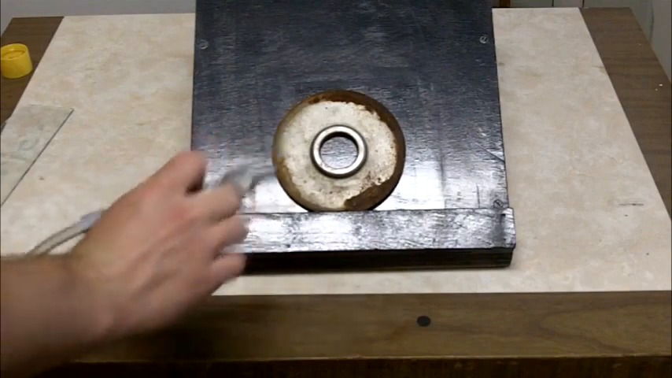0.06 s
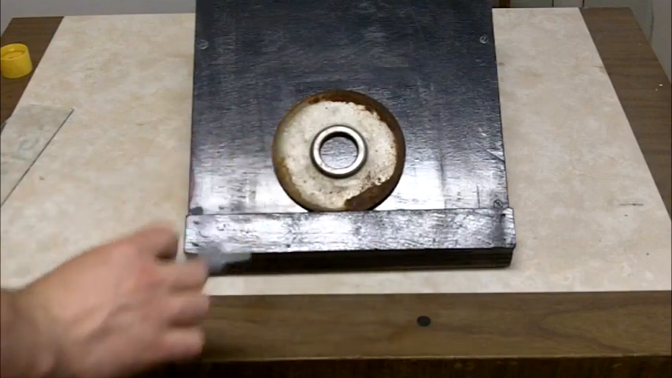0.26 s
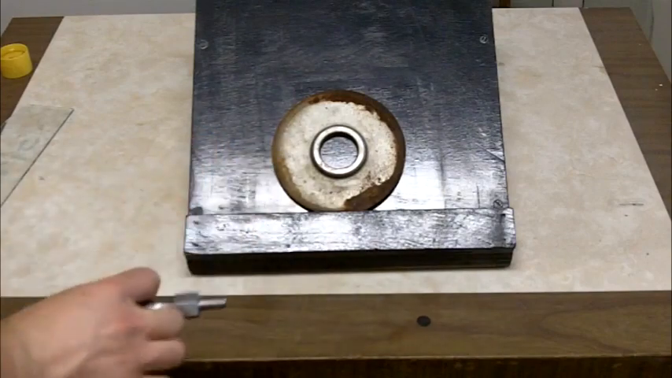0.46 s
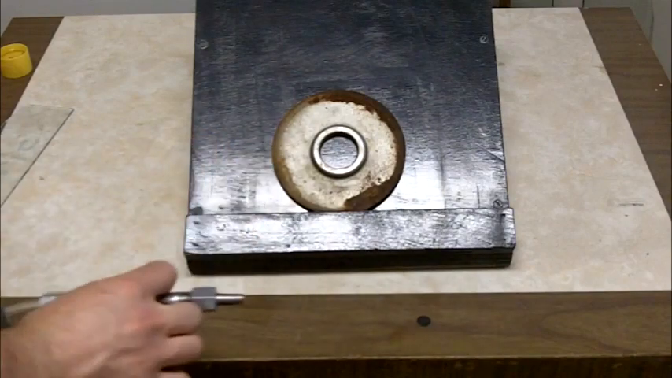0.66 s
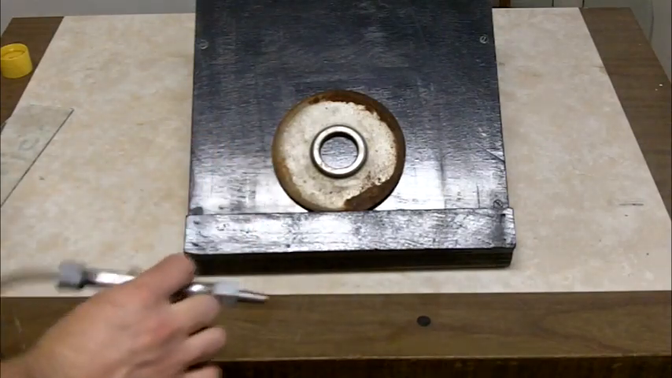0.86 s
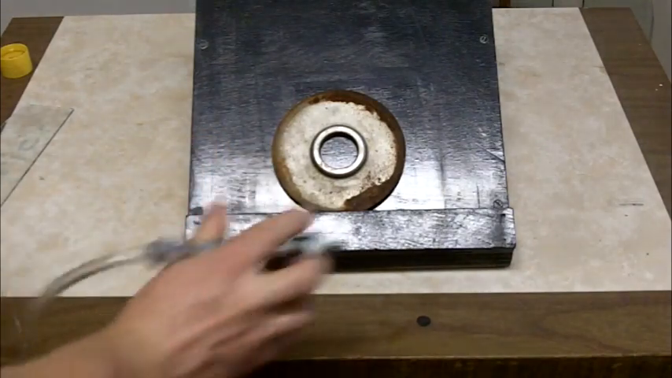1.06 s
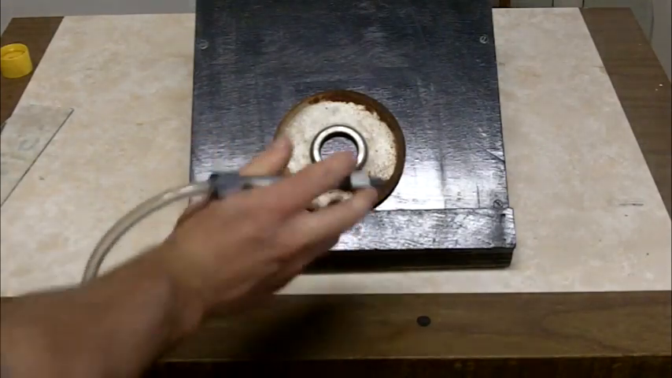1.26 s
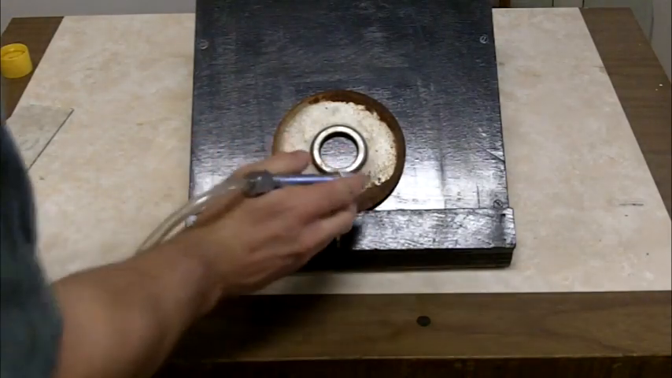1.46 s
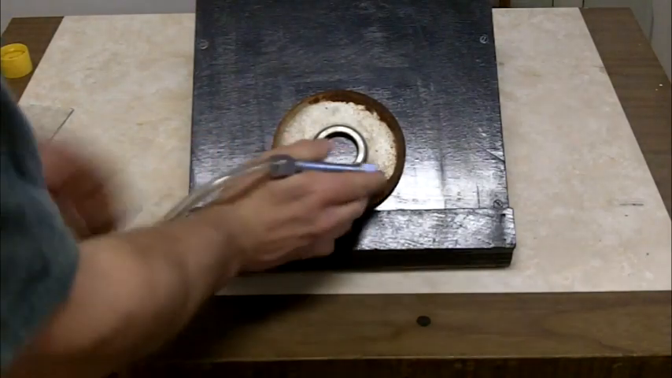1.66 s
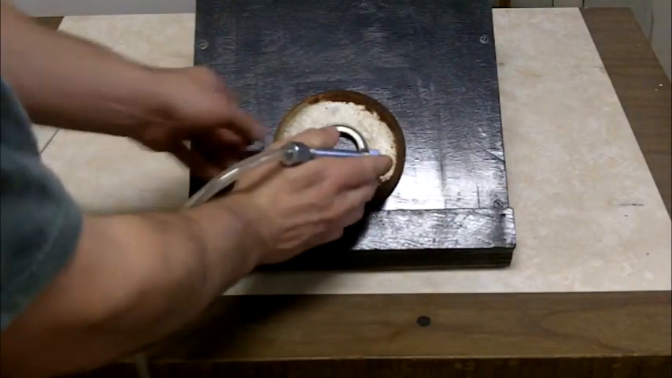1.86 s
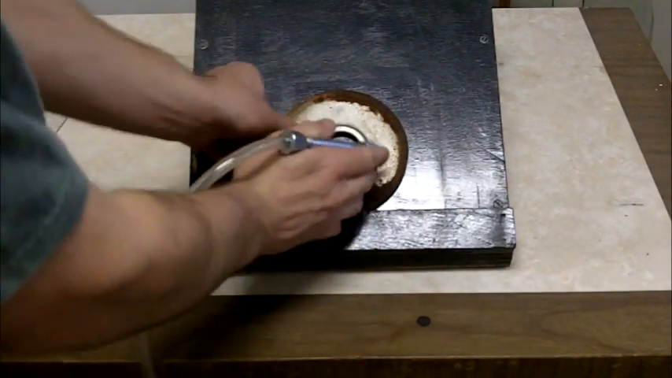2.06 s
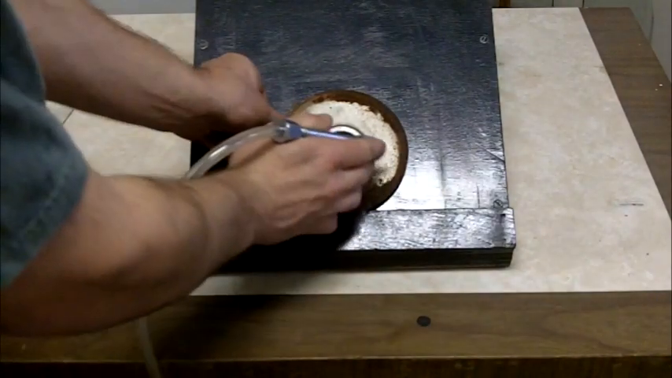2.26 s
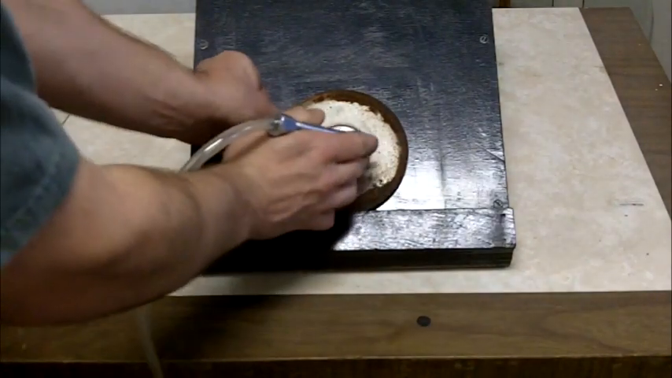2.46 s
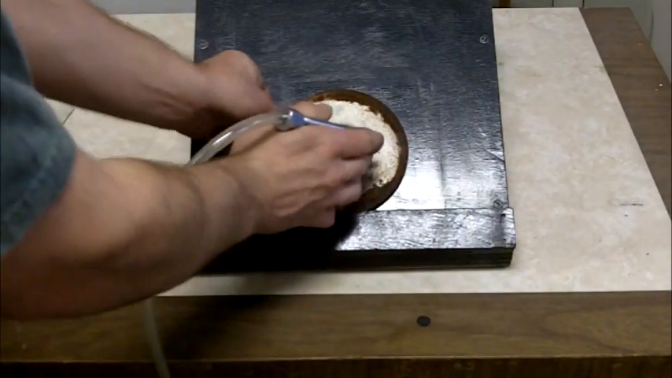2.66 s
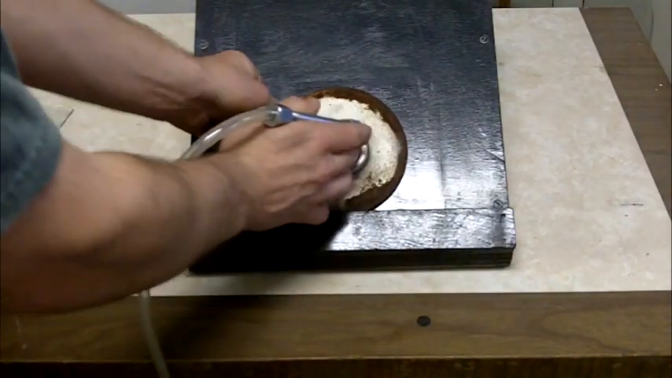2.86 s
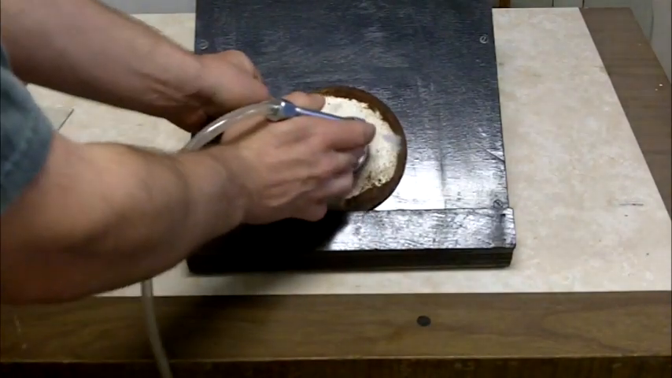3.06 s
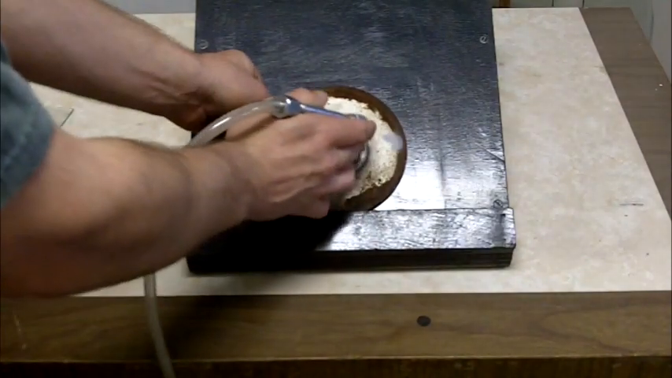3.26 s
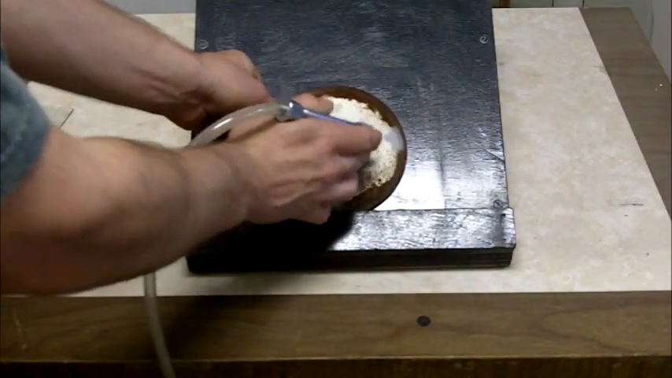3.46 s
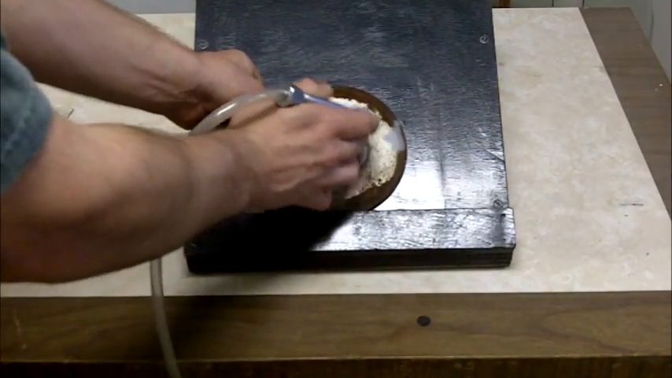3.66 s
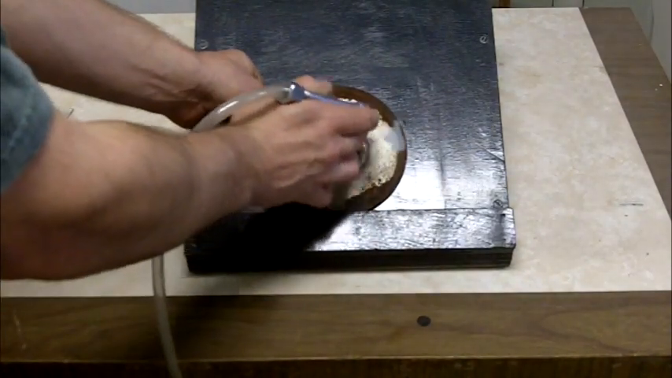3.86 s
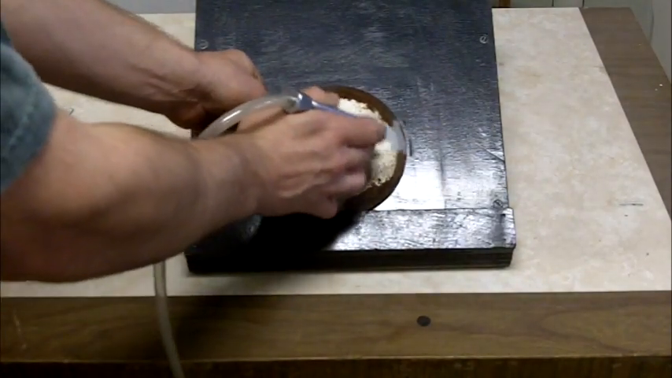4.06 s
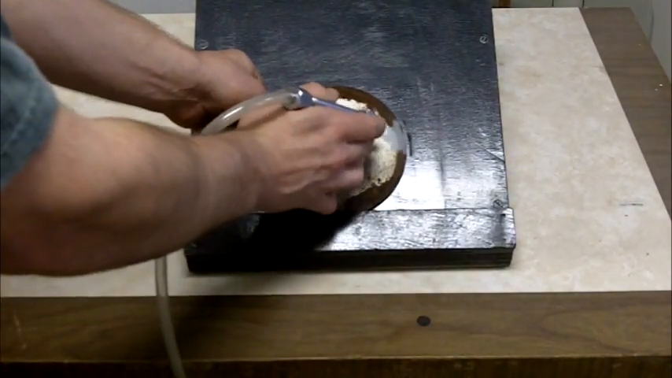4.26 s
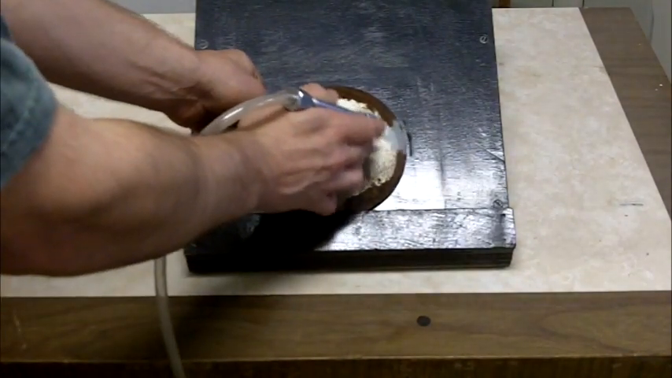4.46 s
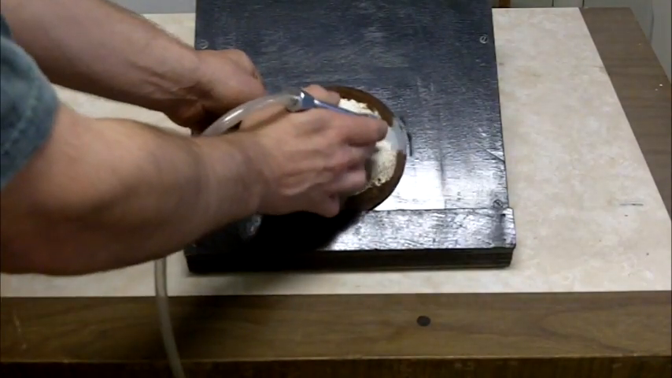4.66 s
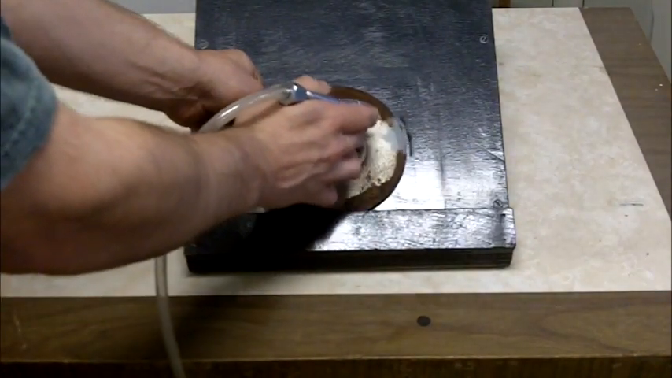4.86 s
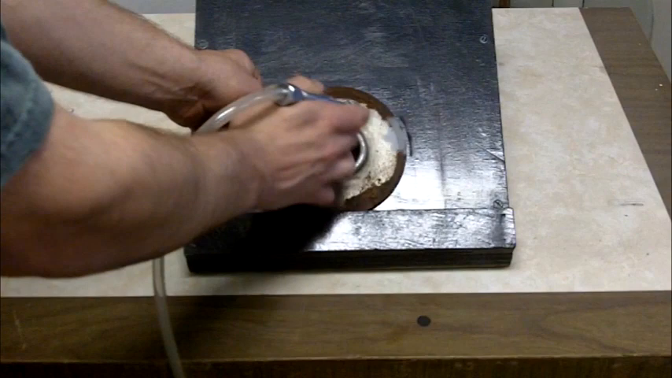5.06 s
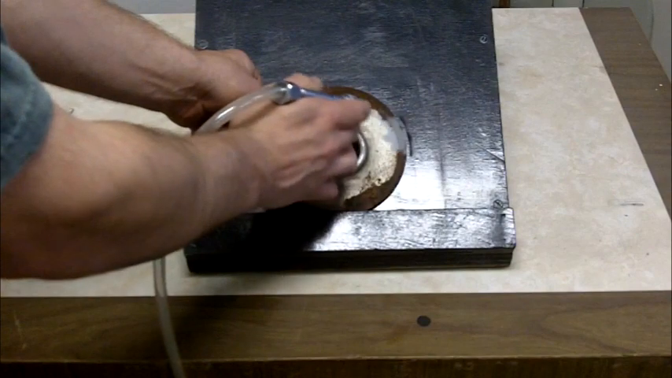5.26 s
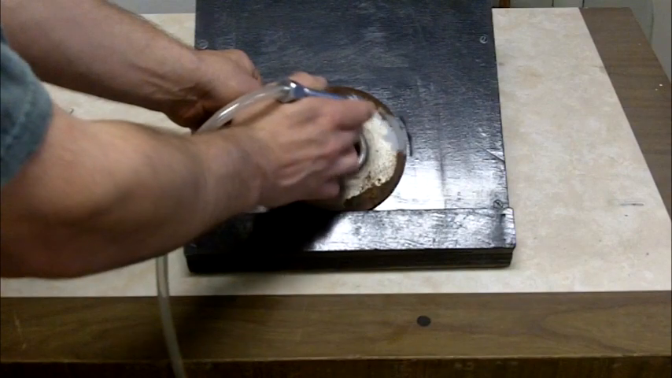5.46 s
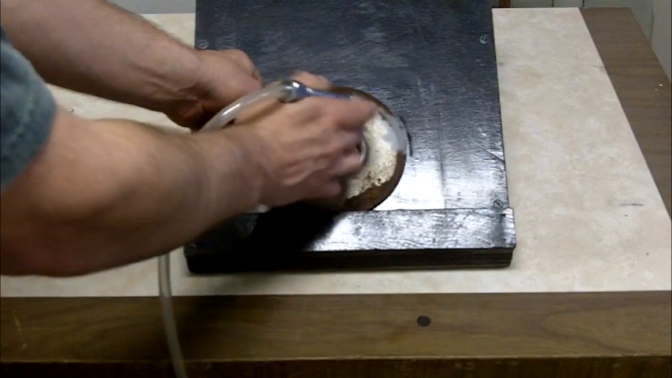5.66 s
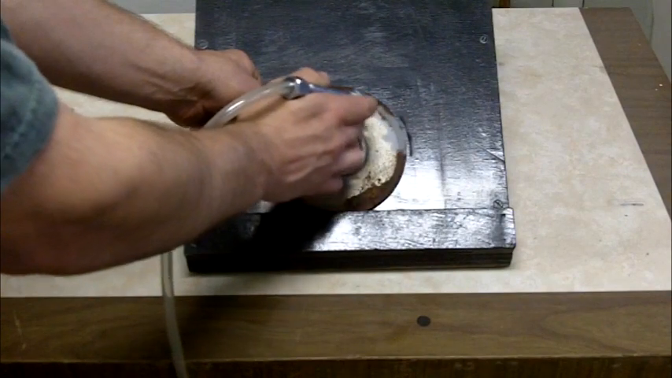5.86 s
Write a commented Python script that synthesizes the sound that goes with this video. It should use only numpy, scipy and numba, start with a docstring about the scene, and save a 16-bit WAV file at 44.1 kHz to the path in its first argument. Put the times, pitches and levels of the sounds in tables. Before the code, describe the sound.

It opens with a wooden knock on a workbench and a sharp clink from a steel nozzle, over the faint hum and rumble of a small workshop with a short echo. Lighter taps and bumps follow from about 0.8 to 2.3 seconds. A hose scrapes across the bench at 1.4 seconds, then rubs with a soft, low judder around 2 seconds. At about 2.4 seconds a sandblaster starts: a loud, high hiss of air and grit striking a steel disc. It surges near 3 seconds, dips briefly, then spits a few bursts of grit around 3.5 seconds. From there the hiss carries on to the end, near 6 seconds, with more sizzle, turning brighter and duller as the nozzle moves. Spent air buffets the close microphone with a low flutter and short gusts, mainly around 3.5 and 4.7 seconds.

```python
"""Sandblasting a rusty steel disc

A hand-held nozzle is brought to a disc on a wooden workbench: wood knocks, steel clinks, a hose drags.
The valve opens: the air jet hisses and grit peppers the steel, brighter or duller as the nozzle is
aimed, and spent air buffets a close microphone. The small workshop adds a short echo, and the
microphone's gain control turns the room's rumble down under the blast."""
import sys
import numpy as np
from scipy import signal
from scipy.fft import rfft, irfft
from scipy.io import wavfile
from scipy.ndimage import uniform_filter1d
from numba import njit

SR = 44100
rng = np.random.default_rng(int(sys.argv[2]) if len(sys.argv) > 2 else 0)


def master(y):
    """Save y as 16-bit WAV."""
    cut = np.clip(np.atleast_2d(y).T, -1, 1)
    pcm = np.round(cut * 32767)  # scale
    wavfile.write(sys.argv[1], SR, pcm.astype(np.int16))


N = 260631
TIME = np.arange(N) / SR
FREQ = np.maximum(np.fft.rfftfreq(N, 1 / SR), 1)

def undb(db):
    return 10 ** (np.asarray(db) / 20)

def unit(x):
    """Scale to rms 1."""
    return x / np.sqrt(np.mean(x ** 2))

def noise():
    return rng.standard_normal(N)

def drift(rate_hz):
    """Smooth random motion with a spread near 1."""
    k = int(SR / rate_hz)
    steps = np.repeat(rng.standard_normal(N // k + 1), k)
    return 1.34 * uniform_filter1d(uniform_filter1d(steps, k), k)[:N]

def colour(x, points):
    """EQ through (freq_hz, gain_db) points."""
    hz, db = np.transpose(points)
    return irfft(rfft(x) * undb(np.interp(np.log(FREQ), np.log(hz), db)), N)

def coloured_noise(points):
    return unit(colour(noise(), points))

def resonance(hz, width_hz):
    """Response of one resonance, 1 at its centre."""
    return 1 / (1 + 1j * (FREQ ** 2 - hz ** 2) / (FREQ * width_hz))

def band_noise(hz, width_hz):
    return unit(irfft(rfft(noise()) * resonance(hz, width_hz) ** 2, N))

def below(x, hz, order=8):
    """Low-pass without delay."""
    return irfft(rfft(x) / (1 + (FREQ / hz) ** (2 * order)), N)

def swell(centre_s, level_db, half_length_s):
    """Bell-shaped fade in and out."""
    return undb(level_db) * np.exp(-((TIME - centre_s) / half_length_s) ** 2)

def hold(start_s, end_s, attack_s, release_s):
    """Envelope 0-1 that rises from the start, holds, and falls from the end."""
    return np.clip((TIME - start_s) / attack_s, 0, 1) * np.clip(1 - (TIME - end_s) / release_s, 0, 1)

# Tone of the workshop's background air: freq_hz, gain_db
ROOM_EQ = [(26, -58), (45, 2.5), (65, -33), (108, -11), (148, -16), (347, -17.5), (637, -25.5),
           (736, -21.5), (1170, -27.5), (1770, -31.5), (3320, -39), (5670, -43), (6560, -32), (9450, -38),
           (15000, -50)]
# Machine hum and thin whines, the close pair beating: pitch_hz, level_db
MACHINE_TONES = [(28.5, -52), (98, -66), (3058, -85), (3086, -85), (9109, -76)]
def room_tone():
    """A bed of soft hiss, low rumble and wavering machine tones."""
    air = coloured_noise(ROOM_EQ) * undb(-57.5 + 2.5 * drift(7.06))
    rumble = band_noise(27.7, width_hz=23.7) * undb(-51.5)
    tones = 0
    for hz, db in MACHINE_TONES:
        amplitude = np.sqrt(2) * undb(db + 2.6 * drift(8.1))
        tones += amplitude * np.sin(2 * np.pi * hz * TIME + 1.26 * drift(6.5))
    return air + rumble + tones

def strikes(hits, modes, crack_db, crack_s, favour_db):
    """Each blow cracks and rings the modes; the struck spot favours some; a softer contact is duller."""
    out, t = np.zeros(N + SR), TIME[:SR]
    hz, db, t60 = np.transpose(modes)[:, :, None]
    for start_s, peak_db, brightness_hz, favoured_hz in hits:
        mode_db = db + favour_db * np.exp(-(10 * np.log(hz / favoured_hz)) ** 2)
        partials = np.sin(2 * np.pi * (hz * t + rng.random(db.shape)))
        ring = np.sum(undb(mode_db - 60 * t / t60) * partials, axis=0)
        crack = undb(crack_db) * rng.standard_normal(SR) * np.exp(-t / crack_s)
        hit = signal.sosfilt(signal.butter(2, brightness_hz, fs=SR, output="sos"), ring + crack)
        start = int(start_s * SR)
        out[start:start + SR] += undb(peak_db) * hit / np.abs(hit).max()
    return out[:N]

# Knocks on the bench: start_s, peak_db, brightness_hz, favoured_hz
BENCH_HITS = [(.0055, -32, 1470, 730), (.0085, -26.5, 910, 368), (1.119, -33, 930, 360),
              (1.473, -31, 2020, 1800), (1.742, -40, 1500, 600), (1.755, -38, 798, 320),
              (1.785, -43, 600, 358), (1.819, -39, 2180, 1750), (2.206, -35.5, 550, 357),
              (2.222, -43.5, 905, 300), (2.352, -44, 600, 355)]
# Woody body of the bench: pitch_hz, level_db, t60_s
BENCH_RING = [(150.4, -8.5, 0.34), (245, -13, 0.23), (307.6, -10.5, 0.3), (352, -6, 0.13), (401, -1, 0.086),
              (606, -7.5, 0.16), (737, -7, 0.13), (975, -11, .08), (1240, -14, 0.041), (1760, -2.5, 0.026)]
def bench_knocks():
    """Bumps ring the wooden bench's low, quickly damped modes."""
    return strikes(BENCH_HITS, BENCH_RING, crack_db=12, crack_s=0.016, favour_db=14.5)

# Metal-on-metal taps: start_s, peak_db, brightness_hz, favoured_hz
NOZZLE_HITS = [(.0865, -26.5, 3200, 3779), (.094, -26.5, 1880, 810), (.817, -44, 3530, 3779),
               (1.0, -49.5, 4000, 3257), (1.379, -34, 1200, 1217), (2.08, -46, 2700, 3257)]
# Ring of the steel: pitch_hz, level_db, t60_s
STEEL_RING = [(690, -4, .15), (818, -4, .22), (1217, -8, .5), (1410, -10, .2), (1550, -7, .3),
              (1780, -7, .1), (1990, -12, .25), (2450, -5, .28), (2789, -7, .12), (3257, -9, .12),
              (3779, -2, .15)]
def nozzle_clinks():
    """The steel nozzle and its fittings touch the work with a sharp tick and a bright ring."""
    return strikes(NOZZLE_HITS, STEEL_RING, crack_db=17, crack_s=0.0069, favour_db=4.5)

# One small squeak: centre_s, level_db, half_length_s, pitch_hz
HOSE_SQUEAK = (1.183, -59.5, .02, 2060)
# Tone of the hose scraping the bench: freq_hz, gain_db
SCRAPE_EQ = [(88, -47), (150, -28), (714, -6.5), (991, -11.5), (1160, -5.5), (1670, -16), (1840, -11),
             (3030, -15), (4630, -15), (5510, -17), (6940, -12), (15000, -47)]
def hose_slide(grab_db=1.5):
    """The hose squeaks once, then scrapes over the bench, speeding up and slowing down."""
    *envelope, squeak_hz = HOSE_SQUEAK
    squeak = band_noise(squeak_hz, width_hz=450) * swell(*envelope)
    scrape = unit(colour(noise() * undb(grab_db * drift(250)), SCRAPE_EQ))
    return squeak + scrape * swell(centre_s=1.433, level_db=-41.5, half_length_s=0.049)

# Tugs that pull the hose taut: start_s, end_s, level_db
HOSE_PULLS = [(1.937, 2.28, -52.5), (2.33, 2.41, -48)]
def hose_judder(judder_hz=127.6, rub_db=-8):
    """The taut hose sticks and slips on the bench edge with a rough, low drone."""
    slip_hz = judder_hz * (1 + .09 * drift(60))
    drone = unit(np.sin(2 * np.pi * np.cumsum(slip_hz) / SR) * undb(3.5 * drift(60)))
    rub = coloured_noise([(60, -17), (160, -12), (400, -7), (1200, -17.5), (2400, -18),
                          (8000, -32), (15000, -44)])
    pull = sum(undb(db) * hold(start, end, attack_s=0.045, release_s=0.08)
               for start, end, db in HOSE_PULLS)
    return (drone + undb(rub_db) * rub) * pull

# Slow balance of the jet's lows and highs against its middle hiss: time_s, roar_db, sizzle_db
JET_BALANCE = [(2.42, -8.5, -17), (2.65, -11, -18), (3.25, -10, -12), (3.85, -7, -8), (4.2, -11, -6),
               (4.65, -8.5, -5), (5.0, -11.5, -7.5), (5.35, -12, -9), (5.8, -9.5, -8)]
# Passes over the disc: centre_s, gain_db, half_length_s, more_roar_db, more_sizzle_db
JET_SWEEPS = [(2.481, 5.5, 0.062, -0.5, 2.5), (2.805, -3.5, 0.15, 1.5, 5), (2.984, 7, 0.091, -0.5, 5.5),
              (3.47, 2.5, 0.031, .5, -1), (3.531, 4.5, 0.037, -0.5, -1), (3.785, 3.5, 0.036, -1.5, -2),
              (3.868, -3, 0.051, -1, 2), (4.046, 0.1, 0.053, 1.4, -1.5), (4.271, 0, .03, 2.5, -1),
              (4.383, 1.5, 0.03, -1.5, 1.5), (4.733, 5, 0.045, -3.3, -3), (4.813, -2, 0.049, 1.5, 1),
              (4.945, 1.5, 0.036, -1.5, -1.5), (5.196, 0.2, 0.044, 0, -3), (5.654, -0.6, 0.17, 1.2, 0.5)]
def aim(jet_db=-13, wander_db=.5, wander_hz=9):
    """The jet's level, roar and sizzle in dB as an unsteady hand sweeps it over the disc."""
    times, *shares = np.transpose(JET_BALANCE)
    roar_db, sizzle_db = (np.interp(TIME, times, db) + wander_db * drift(wander_hz) for db in shares)
    # the jet drifts off the work and snaps back: the impact hiss falls and the roar stands out
    miss = hold(3.144, 3.495, attack_s=.13, release_s=0.024)
    level_db = jet_db - 8.5 * miss
    roar_db += 4.5 * miss
    for centre_s, gain_db, half_length_s, more_roar_db, more_sizzle_db in JET_SWEEPS:
        bell = swell(centre_s, 0, half_length_s)
        level_db += gain_db * bell
        roar_db += more_roar_db * bell
        sizzle_db += more_sizzle_db * bell
    return level_db, roar_db, sizzle_db

# Slugs of grit spat from the nozzle, relative to the air stream: start_s, level_db, decay_s
GRIT_SLUGS = [(2.481, -5, .002), (3.353, -6, 0.014), (3.397, 5.5, 0.017), (3.434, 9.5, 0.02),
              (3.513, 8.5, 0.012)]
def grit(grains_per_s=9000, spread_db=2.5, level_db=-2, feed_wobble_db=1.65):
    """Single grains tick on the steel; the feed is uneven and now and then spits a slug."""
    ticks = (rng.random(N) < grains_per_s / SR) * np.sign(noise())
    ticks *= undb(spread_db * np.minimum(rng.exponential(size=N), 4))
    spray = undb(level_db + feed_wobble_db * drift(90)) * unit(ticks)
    for start_s, db, decay_s in GRIT_SLUGS:
        spray += undb(db) * noise() * (TIME >= start_s) * np.exp(-np.abs(TIME - start_s) / decay_s)
    return spray

# Resonances of the disc and the hollow of the hand: pitch_hz, width_hz, gain_db
DISC_AND_HAND = [(2570, 270, -13.5), (3145, 67, 0), (4640, 180, -7.5), (6910, 330, -9.5),
                 (9130, 330, -10.5), (10140, 280, -6.5)]
def disc_and_hand(stream, wander_db=5.5):
    """The stream rings the disc and the cupped hand; each resonance swells and fades as the hand moves."""
    spectrum = rfft(stream)
    return stream + sum(
        undb(db + wander_db * np.tanh(drift(4.78))) * irfft(spectrum * resonance(hz, width_hz), N)
        for hz, width_hz, db in DISC_AND_HAND)

# Tone of the jet before its three bands are balanced: freq_hz, gain_db
JET_EQ = [(100, -32), (400, -27), (1000, -24.5), (1550, -21), (2200, -9), (2800, -10.5), (3600, -12),
          (4650, -7), (5300, -11), (6200, -1), (7100, 1), (8300, -1.5), (10400, -8.5), (12500, -17.5),
          (14200, -28), (15500, -31)]
def jet(roar_db, sizzle_db, roar_below_hz=5040, sizzle_above_hz=9830):
    """Air and grit hit the disc: big eddies roar, the impact hisses, the finest grains sizzle."""
    spray = grit()
    # nozzle and point of impact lie apart, so each has its own echoes
    stream = workshop_echo(noise(), wet_db=-4) + workshop_echo(spray, wet_db=-3)
    full = colour(disc_and_hand(stream), JET_EQ)
    roar = below(full, roar_below_hz)
    sizzle = full - below(full, sizzle_above_hz)
    hiss = full - roar - sizzle
    return unit(hiss) + undb(roar_db) * unit(roar) + undb(sizzle_db) * unit(sizzle)

# Gusts rushing past the microphone: centre_s, level_db, half_length_s
AIR_GUSTS = [(3.008, -44, .08), (3.426, -37, 0.05), (3.522, -35.5, 0.042), (3.78, -40, .04),
             (4.735, -34.5, 0.034)]
# Bass-heavy tone of a gust: freq_hz, gain_db
GUST_EQ = [(12, 2), (30, 6), (60, 1), (120, -10), (230, -8.5), (500, -11.5), (1100, -17), (3000, -27)]
def spent_air(jet_db):
    """Spent air buffets the microphone: a deep flutter that follows the jet, and a few short gusts."""
    buffet = coloured_noise([(10, 12.5), (30, -6.5), (80, -10), (200, -23), (1000, -70)])
    gusts = coloured_noise(GUST_EQ) * sum(swell(*gust) for gust in AIR_GUSTS)
    return buffet * undb(jet_db - 32) + gusts

def blast(valve_opens_s=2.3323, valve_travel_s=0.15):
    """The opening valve fades in the jet, with the spent air just behind it."""
    level_db, roar_db, sizzle_db = aim()
    level_db += 0.48 * drift(20)  # the air pressure flutters
    opening = np.clip((TIME - valve_opens_s) / valve_travel_s, 0, 1)
    flow = jet(roar_db, sizzle_db) * undb(level_db) + spent_air(level_db) * opening
    return flow * opening ** 2.35

def workshop_echo(x, wet_db, t60_s=0.59, predelay_s=.004):
    """Add the small room's diffuse echo, which starts with the nearest surfaces."""
    t = TIME[:SR]
    tail = rng.standard_normal(SR) * undb(-60 * t / t60_s) * (t > predelay_s)
    return x + undb(wet_db) * signal.fftconvolve(x, tail / np.linalg.norm(tail))[:N]

def scene():
    """Handling, blast and room tone in the centre, with a faint rumble and hiss for width."""
    handling = bench_knocks() + nozzle_clinks() + hose_slide() + hose_judder()
    mid = workshop_echo(handling, wet_db=-5) + blast() + room_tone()
    side_eq = [(20, 5.5), (60, 3.5), (150, -13), (500, -22), (2000, -39), (12000, -36.5)]
    side = undb(-66) * coloured_noise(side_eq)
    return np.array([mid + side, mid - side])

@njit
def follow(x, attack_s, release_s):
    """Envelope follower with separate rise and fall times."""
    out, level = np.empty(len(x)), 0.
    for i in range(len(x)):
        level += (x[i] - level) / (SR * (attack_s if x[i] > level else release_s))
        out[i] = level
    return out

# Steady bias, one row per channel: offset_of_full_scale
DC_OFFSET = [
    [.015],
    [.001],
]
def record(dry, notch_hz=5480, notch_q=5.8, threshold_db=-22.5, top_hz=15200):
    """The microphone port notches one band; gain control ducks at the blast and stays low; a top cut."""
    heard = dry - .9 * signal.lfilter(*signal.iirpeak(notch_hz, notch_q, fs=SR), dry)
    loudness = np.sqrt(np.abs(uniform_filter1d(heard[0] ** 2, size=900)))
    envelope = follow(loudness, attack_s=0.00068, release_s=40.)
    gain = 1 / np.maximum(1, envelope / undb(threshold_db))
    lowpass = signal.ellip(12, .1, 80, top_hz, fs=SR, output="sos")
    return signal.sosfilt(lowpass, heard * gain) + np.array(DC_OFFSET)

dry = scene()
out = record(dry)
master(out)
```